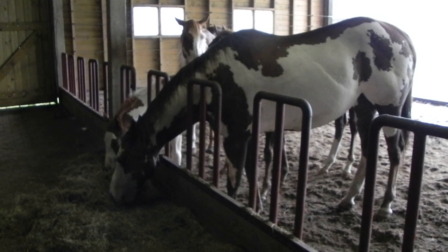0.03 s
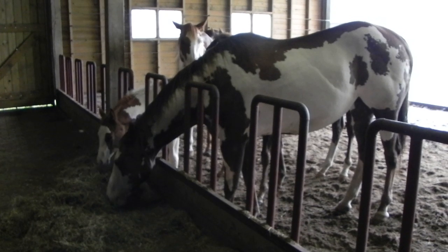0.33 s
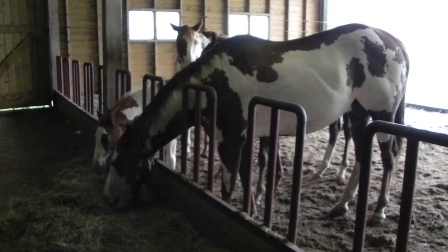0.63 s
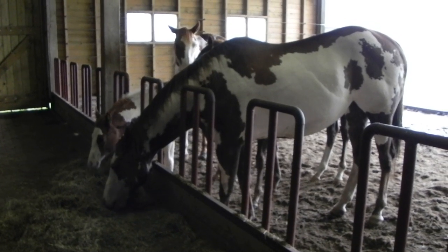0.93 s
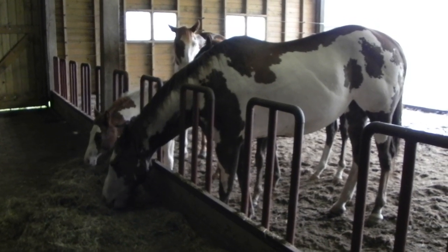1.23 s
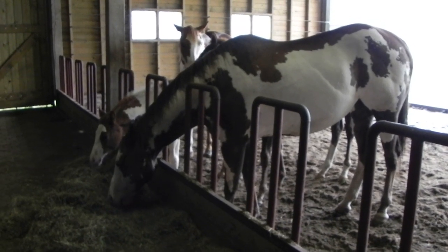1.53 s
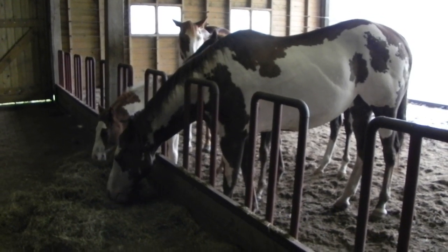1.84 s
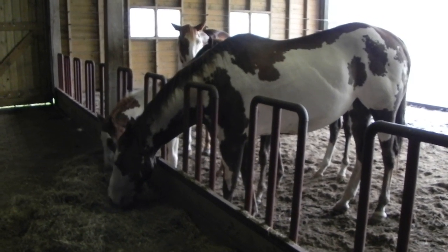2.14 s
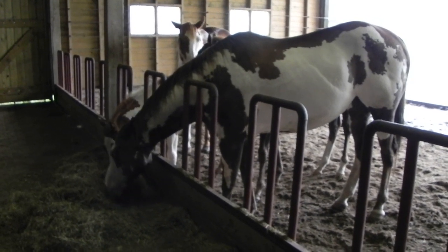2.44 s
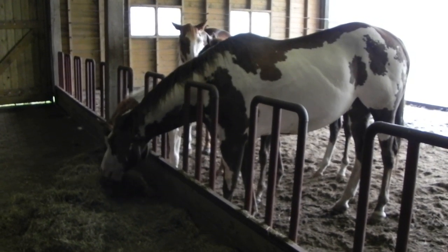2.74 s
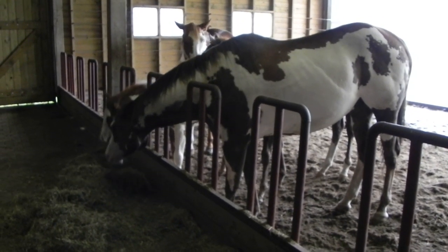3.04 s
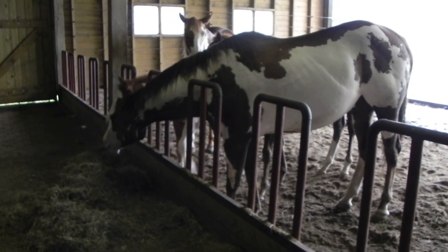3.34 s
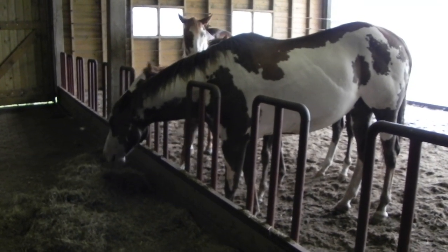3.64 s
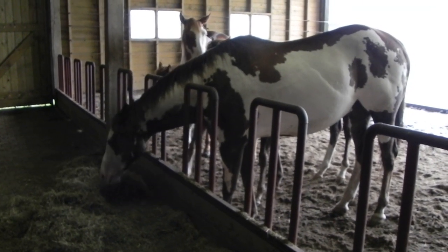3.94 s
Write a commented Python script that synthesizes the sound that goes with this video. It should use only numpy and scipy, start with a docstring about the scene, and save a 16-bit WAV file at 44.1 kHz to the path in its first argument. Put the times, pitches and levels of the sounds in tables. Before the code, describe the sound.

Heavy rain falls steadily on a sheet-metal roof, heard from inside a barn. Countless drops blur into a hissing wash over hollow drumming, with small splashes and pings standing out. Faint low handling bumps touch the microphone.

```python
"""Inside a barn with a sheet-metal roof, under heavy rain.
Thousands of drops a second tick on the panels and blur into a wash; fat drops make the sheets drum.
Splashes, pings and brief ringing swells stand out, and the treble leans to the open side on the right.
The lows start wide and soon fold to the middle. Faint low bumps come from a hand holding a camera."""
import sys
import numpy as np
from scipy import signal
from scipy.fft import rfft, irfft
from scipy.io import wavfile
from scipy.ndimage import uniform_filter1d

SR = 44100
rng = np.random.default_rng(int(sys.argv[2]) if len(sys.argv) > 2 else 0)


def store_wav(level_fs):
    """Save 16-bit WAV to argv[1]."""
    pcm = np.round(np.clip(np.atleast_2d(level_fs), -1, 1) * 32767)
    wavfile.write(sys.argv[1], SR, pcm.T.astype(np.int16))


N = 176400

# Tone of small drops on the roof. Each row: frequency in Hz, relative level in dB.
PATTER_TONE = [(20, -100), (45, -102), (75, -82), (110, -78.5), (160, -76), (260, -78.5), (400, -68),
               (800, -67), (1150, -67.5), (1430, -68), (1650, -65.7), (2500, -67.8), (3200, -69.5),
               (3750, -68.5), (4200, -70.5), (5000, -71.6), (6100, -71.7), (6520, -69.3), (6950, -72.3),
               (8000, -73.2), (9800, -75.7), (11500, -83), (13200, -85.5), (15500, -85)]
# Low resonances of the roof sheets. Each row: frequency in Hz, relative level in dB.
SHEET_TONE = [(200, -100), (258, -88), (305, -67), (360, -61.5), (425, -57), (470, -60), (515, -66),
              (600, -70.5), (740, -65), (850, -67.3), (1020, -64.5), (1220, -66.3), (1420, -76.5),
              (2500, -81.5), (5000, -100)]
# Surges of the downpour. Each row: time in seconds, then gains in dB for the patter's body,
# the drumming and the patter's treble.
DOWNPOUR = [(.1, 2.7, 5.2, -.3), (.26, 2, 2, .2), (.315, -2.5, 1.5, 1), (.37, -.5, .3, -.3),
            (.6, -1.2, -.3, 0), (.82, -.8, -.2, -.9), (.98, -1.8, .3, -1.3), (1.15, -.5, 1.1, .3),
            (1.34, .1, -.2, 1.1), (1.48, -.5, -1.3, 0), (1.58, .2, .6, -.6), (1.76, -.7, 0, 0),
            (1.95, .4, 2, 0), (2.25, .3, -.4, -.2), (2.5, 1.2, 0, -.1), (2.7, -.3, .7, -.9),
            (2.8, 1.2, -1.3, -.5), (2.95, .3, -.5, -.3), (3.5, .3, .4, .9), (3.72, -.3, .5, -.5),
            (3.87, -.1, 1.5, 0), (4.0, .3, .5, 0)]
# Ringing bursts of splatter. Each row: peak time in seconds, centre in Hz, bandwidth in Hz,
# length in seconds, level in dB.
SPLATTER_SWELLS = [(.22, 4200, 2800, .11, -38.5), (.243, 3900, 550, .016, -35), (.395, 418, 140, .025, -37),
                   (.491, 6800, 500, .016, -41), (.828, 830, 200, .026, -37), (1.146, 380, 100, .036, -33),
                   (1.299, 7020, 450, .016, -40), (1.3, 9480, 500, .02, -43), (1.59, 1050, 400, .04, -37),
                   (2.12, 1090, 110, .037, -37), (2.334, 3875, 250, .016, -40.5),
                   (2.455, 2330, 300, .04, -39), (2.71, 800, 300, .04, -37), (2.898, 8500, 3500, .035, -40),
                   (3.06, 430, 120, .03, -35), (3.395, 3850, 250, .04, -41.5), (3.533, 990, 150, .25, -40),
                   (3.535, 4520, 300, .018, -41), (3.87, 4950, 350, .018, -36.5)]
# Stereo picture of the patter. Each row: frequency in Hz, left minus right in dB,
# likeness of the two sides from 0 to 1 (where not folded to the middle).
PATTER_IMAGE = [(1500, 0, 0.3), (2900, 0, 0.36), (3300, 0.5, 0.11), (5000, -2.5, 0.12), (7000, -4, 0.21),
                (10000, -2.3, 0.22), (15000, -.8, 0.3)]
# Bumps of the hand. Each row: start in seconds, hold in seconds, press and release in relative dB.
HAND_BUMPS = [(.612, .02, -49, -39), (.675, .02, -48, -47), (.711, .028, -46, -48), (.909, .019, -47, -43),
              (1.085, .021, -51, -47), (1.127, .018, -47, -38), (1.274, .019, -49, -46),
              (1.337, .021, -44, -45), (1.53, .02, -46, -46), (1.657, .021, -48, -42),
              (1.786, .02, -47, -39), (2.36, .021, -44, -44), (2.807, .018, -48, -44),
              (3.063, .023, -44, -44), (3.727, .012, -44, -46), (3.765, .007, -41, -42)]

IMPACT_S = 0.00057  # a drop takes this long to flatten
# Layer levels in dB are relative, set ahead of the tone curves.
TICK_PER_S, TICK_SCATTER_DB, TICK_T60_S, TICK_DB, WASH_DB = 4500, 4.5, 0.0087, -4.7, -2.7
SPLASH_PER_S, SPLASH_SCATTER_DB, SPLASH_T60_S, SPLASH_DB, SPLASH_LOW_HZ = 160, -0.5, 0.015, -13, 2180
THUD_PER_S, THUD_SCATTER_DB, THUD_T60_S, THUD_DB, ROAR_DB = 700, 4, 0.022, -5, -2
PING_PER_S, PING_SCATTER_DB, PING_T60_S, PING_DB = 450, 1.3, .075, -15.5

TIME_S = np.arange(N) / SR
BIN_HZ = np.arange(N // 2 + 1) * SR / N
SIDES = np.array([[1], [-1]])  # left, right


def patter():
    """Small drops tick on the roof over the wash of countless far ones; near splashes and pings stand out."""
    ticks = drops(TICK_PER_S, TICK_SCATTER_DB, TICK_T60_S, spread_db=3)
    ticks = hold_level(ticks, span_s=.15)
    splashes = drops(SPLASH_PER_S, SPLASH_SCATTER_DB, SPLASH_T60_S, spread_db=10)
    splashes = undb(SPLASH_DB) * band(splashes, SPLASH_LOW_HZ, "high")
    flurry = undb(TICK_DB + 0.25 * wander(25))
    wash = undb(WASH_DB) * rng.standard_normal((2, N))
    return colour(flurry * ticks + wash + splashes + undb(PING_DB) * pings(), PATTER_TONE)


def drops(per_s, scatter_db, t60_s, spread_db, patches=12):
    """Drops of many sizes land at random on patches of roof, each with its own ring and direction."""
    rings = ring_spectra(t60_s, 2 * patches).reshape(patches, 2, -1)
    spectrum = 0
    for ring, side in zip(rings, np.linspace(-1, 1, patches)):
        lands = rng.random(N) < per_s / patches / SR
        size = undb(scatter_db * np.minimum(rng.standard_normal(N), 2.6))
        hits = lands * size
        pan = undb(side * spread_db * SIDES / 2)
        spectrum = spectrum + rfft(hits - hits.mean()) * ring * pan
    return unit(irfft(spectrum, N))


def ring_spectra(t60_s, count):
    """Struck metal rings in dense modes: spectra of dying noise bursts, together even in colour."""
    envelope = strike(TIME_S[:SR], t60_s)
    rings = rfft(rng.standard_normal((count, SR)) * envelope, N)
    power = uniform_filter1d(np.mean(np.abs(rings) ** 2, axis=0), N // 400)
    return rings / np.sqrt(power)


def strike(t, t60_s):
    """A ring builds as the drop flattens, then dies by 60 dB in t60_s."""
    return (1 - np.exp(-t / IMPACT_S)) * np.exp(-np.log(1000) * t / t60_s)


def shimmer(x, bands=30, depth_db=0.8, per_s=22):
    """Neighbouring bands flicker on their own as the drops hit ever different spots."""
    place = np.interp(np.log(BIN_HZ + 1), np.log([500, 16000]), [0, bands - 1])
    spectrum = rfft(x)
    out = 0
    for k in range(bands):
        window = np.maximum(1 - np.abs(place - k), 0)
        out = out + irfft(spectrum * window, N) * undb(depth_db * wander(per_s))
    return out


def stereo_image(pair, mono_lows, wide_above_hz=3080):
    """The treble stays wide and leans to the open side on the right; mono_lows centres the lows."""
    a, b = rfft(pair)
    lows = np.clip((wide_above_hz - BIN_HZ) / 100 + .5, 0, 1)
    width = (1 - mono_lows * lows) * (1 - by_hz(PATTER_IMAGE, column=2))
    mid = (a + b) / 2 * np.sqrt(2 - width)
    side = (a - b) / 2 * np.sqrt(width)
    lean = undb(SIDES * by_hz(PATTER_IMAGE) / 2)
    return irfft((mid + SIDES * side) * lean, N)


def drumming():
    """Fat drops keep the roof sheets ringing in their low resonances; far ones merge into a roar."""
    thuds = drops(THUD_PER_S, THUD_SCATTER_DB, THUD_T60_S, spread_db=-1, patches=24)[0]
    roar = undb(ROAR_DB) * rng.standard_normal(N)
    sheets = colour(undb(THUD_DB) * thuds + roar, SHEET_TONE)
    return hold_level(sheets, span_s=.07)


def pings(low_hz=1200, high_hz=13000):
    """Some drops strike edges and fittings and ring briefly, each at its own pitch and place."""
    t = TIME_S[:SR // 6]
    envelope = strike(t, PING_T60_S)
    out = np.zeros((2, N + len(t)))
    draws = rng.random((4000, 4))
    for when, pitch, size, side in draws[:int(PING_PER_S * N / SR)]:
        hz = low_hz * (high_hz / low_hz) ** np.sqrt(pitch)  # favours the high pitches
        gain = undb(PING_SCATTER_DB * min(-np.log(size), 4))
        ring = gain * envelope * np.sin(2 * np.pi * hz * t)
        start = int(when * N)
        out[:, start:start + len(t)] += np.sqrt([[1 - side], [side]]) * ring
    return unit(out[:, :N])


def splatter():
    """Short bursts of splatter swell out of the rain, each ringing in one band."""
    out = 0
    for peak_s, hz, width_hz, length_s, db in SPLATTER_SWELLS:
        swell = np.exp(-2 * ((TIME_S - peak_s) / length_s) ** 2)
        ring = band(rng.standard_normal(N), [hz - width_hz / 2, hz + width_hz / 2], "bandpass", order=3)
        out = out + undb(db) * unit(ring * swell) * np.sqrt(np.mean(swell ** 2))
    return out


def hand_bumps(rise_s=.0016, low_hz=60, high_hz=230):
    """A hand jolts the camera body as it presses, and the opposite way as it lets go: dull, low knocks."""
    push = 0
    for start_s, hold_s, press_db, release_db in HAND_BUMPS:
        press = undb(press_db) * np.clip((TIME_S - start_s) / rise_s, 0, 1)
        release = undb(release_db) * np.clip((TIME_S - start_s - hold_s) / rise_s, 0, 1)
        push = push + release - press
    return 2 * band(band(push, low_hz, "high"), high_hz, "low")


def colour(x, tone):
    """Shape a sound to a tone curve with a minimum-phase filter, so attacks stay sharp."""
    gain = undb(by_hz(tone)) * np.sqrt(SR / 2)
    cepstrum = irfft(np.log(gain), N)
    fold = 1 + np.sign(N / 2 - np.arange(N))
    fold[0] = 1
    return irfft(rfft(x) * np.exp(rfft(cepstrum * fold)), N)


def hold_level(x, span_s):
    """Ride the gain so the level is steady over spans longer than span_s."""
    size = int(span_s * SR)
    power = uniform_filter1d(uniform_filter1d(x ** 2, size), size)
    return x * np.sqrt(np.mean(x ** 2) / power)


def by_hz(table, column=1):
    """One column of a table, read at every frequency on a log axis."""
    rows = np.array(table, float)
    return np.interp(np.log(BIN_HZ + 1), np.log(rows[:, 0]), rows[:, column])


def band(x, hz, kind, order=2):
    """Butterworth filter."""
    return signal.sosfilt(signal.butter(order, hz, kind, fs=SR, output="sos"), x)


def wander(per_s):
    """Random drift with a spread near 1."""
    steps = rng.standard_normal(400)
    return 1.28 * np.interp(TIME_S * per_s, np.arange(len(steps)), steps)


def fade_in(centre_s, length_s):
    """Straight fade from 0 to 1."""
    return np.clip((TIME_S - centre_s) / length_s + .5, 0, 1)


def undb(db):
    """Decibels to gain."""
    return 10 ** (np.asarray(db) / 20)


def unit(x):
    """Scale to rms 1."""
    return x / np.sqrt(np.mean(x ** 2))


def scene():
    """The rain cuts in; patter and drumming ride the downpour, their lows wide at first, then centred."""
    times, *levels = np.array(DOWNPOUR).T
    body_gain, drum_gain, treble_gain = (undb(np.interp(TIME_S, times, db)) for db in levels)
    rain = shimmer(patter())
    treble = band(rain, 3500, "high", order=1)
    rain = (rain - treble) * body_gain + treble * treble_gain
    centred = fade_in(centre_s=0.348, length_s=0.028)
    wide = 1 - centred
    rain = centred * stereo_image(rain, mono_lows=True) + wide * stereo_image(rain, mono_lows=False)
    drums = drumming() * drum_gain * (centred + wide * SIDES)  # starts out of phase between the ears
    mix = rain + drums + splatter() + hand_bumps()
    return mix * fade_in(centre_s=0.0995, length_s=0.005)


def record(dry, top_hz=15800):
    """A steep low-pass takes off the very top of the treble."""
    return signal.sosfilt(signal.ellip(12, .1, 90, top_hz, fs=SR, output="sos"), dry)


dry = scene()
out = record(dry)
store_wav(out)
```